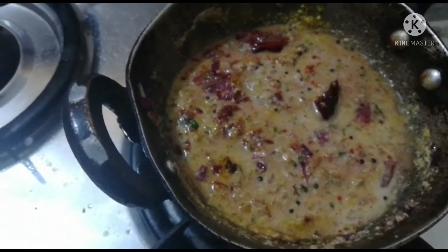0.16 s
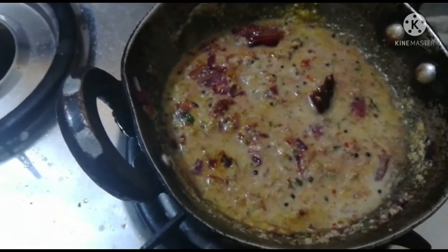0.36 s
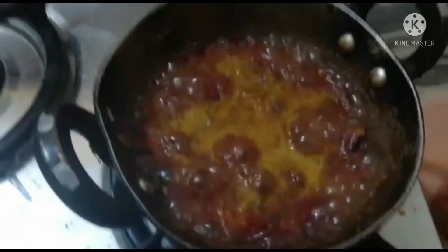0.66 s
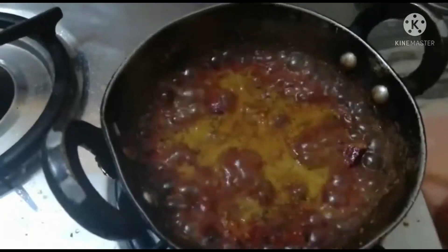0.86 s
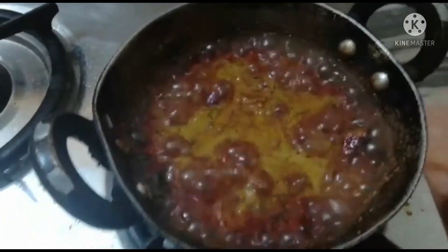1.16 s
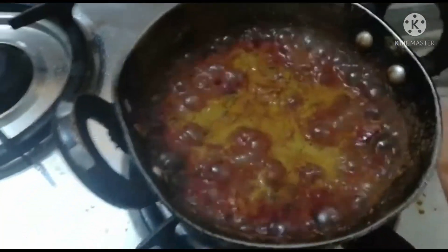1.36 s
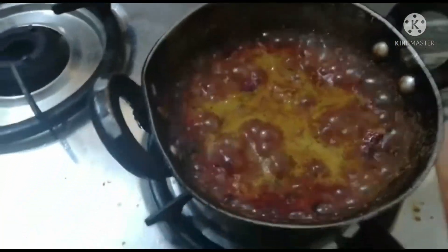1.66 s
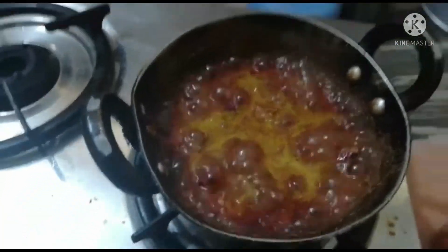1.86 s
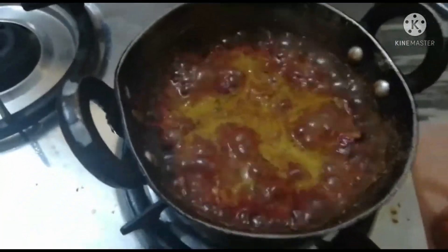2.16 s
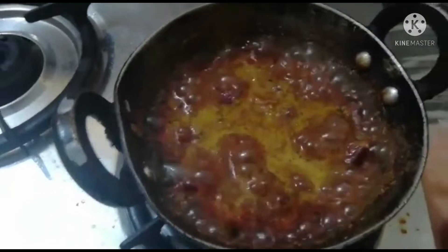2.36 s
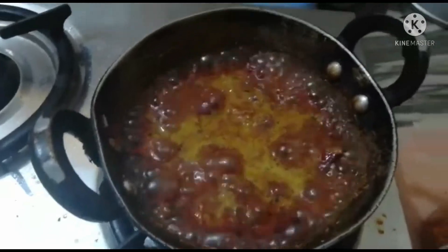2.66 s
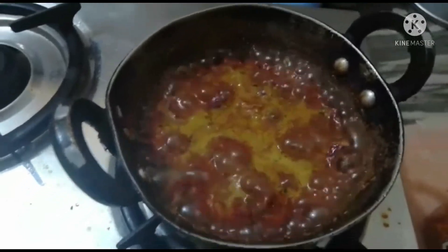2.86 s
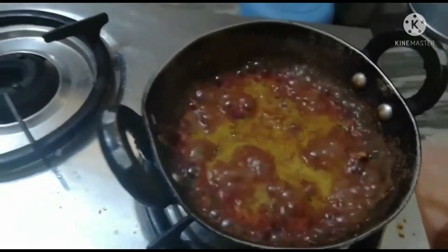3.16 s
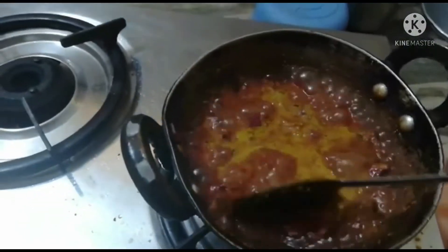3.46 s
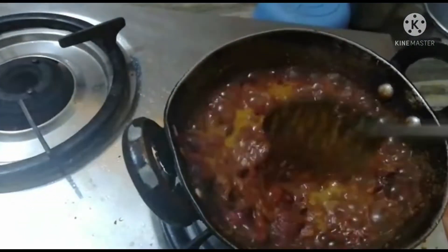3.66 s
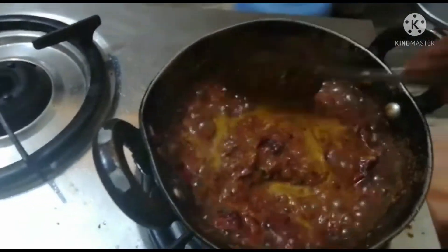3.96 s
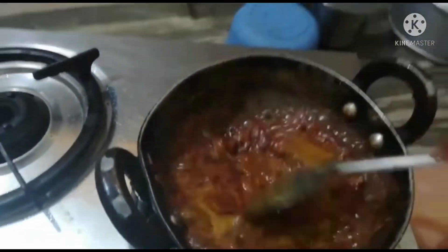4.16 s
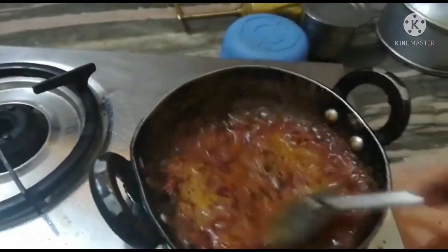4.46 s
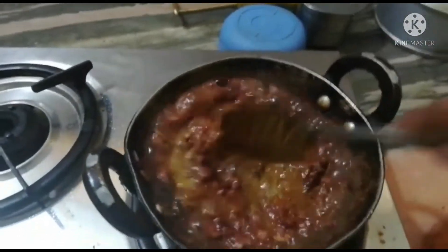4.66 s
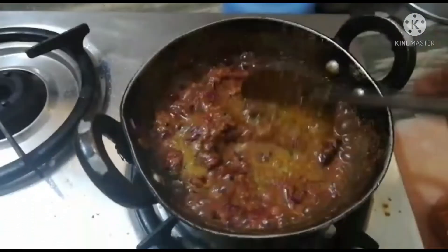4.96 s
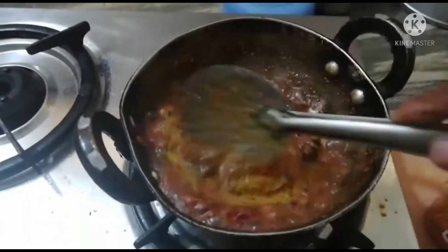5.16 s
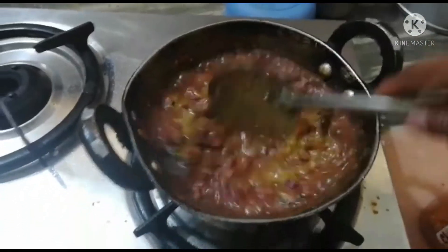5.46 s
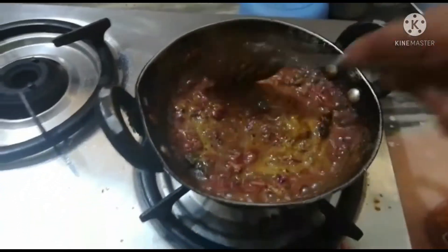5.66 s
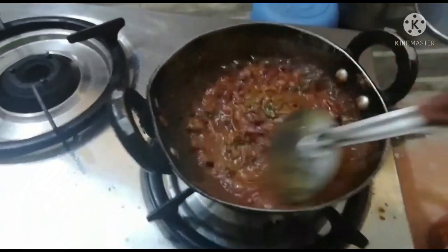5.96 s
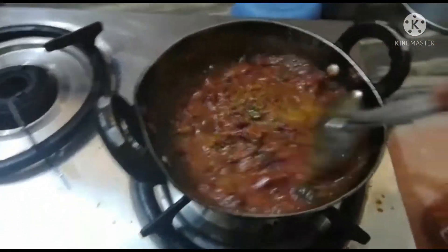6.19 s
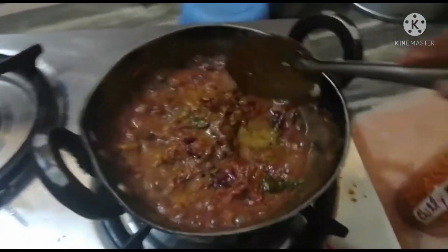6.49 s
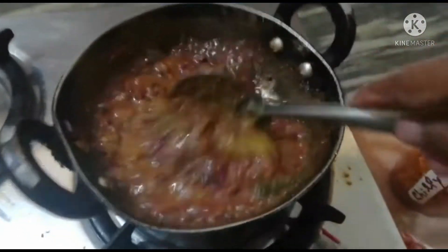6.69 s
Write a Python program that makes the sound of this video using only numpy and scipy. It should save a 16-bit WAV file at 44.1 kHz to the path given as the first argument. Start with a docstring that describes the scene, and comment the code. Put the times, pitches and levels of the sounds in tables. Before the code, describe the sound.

For the first half second spices fry very quietly, with a faint clink at the start and a faint distant vessel ring near 0.5 s. The sound fades out by 0.6 s and is silent until 0.9 s. Then a thick sauce comes in abruptly, bubbling densely, crackling and spitting over fine sizzle and a low gas-flame rumble. A strong low bump of the hand-held microphone comes at 2.2 s. Bright, thin steel clinks follow at 2.55, 2.65 and 2.8 s, among sharp pops. From 3.5 s sizzle flares with stirring. The spoon knocks and lightly scrapes the pan at 4.2-4.3 s, clangs at 4.7 s; a sharp spit and low bumps fall around 5.0-5.1 s. Busier knocks and rasps run from 5.6 to 6.15 s under a stronger sizzle, then single knocks at 6.4 and 6.5 s, and the loudest ringing knock at 6.8 s.

```python
"""Spices fry quietly; after a short silence, a thick sauce bubbles, spits and sizzles in a metal pan.
The food is random bursts ringing in resonators over hiss; single bursts, faint to loud, are swelling tones with a snap.
A steel spoon clinks on cutlery, then scrapes and knocks the pan: decaying modes over a wash of filtered noise.
Low noise rumbles as the gas flame, a vessel rings faintly, and swinging low tones bump the hand-held microphone.
"""
import sys
import numpy as np
from scipy import signal
from scipy.fft import rfft, irfft, next_fast_len
from scipy.io import wavfile

SR = 44100
rng = np.random.default_rng(int(sys.argv[2]) if len(sys.argv) > 2 else 0)


def materialize(psi):
    """Save the field psi as 16-bit PCM at rate SR to the path in sys.argv[1].

    A 1-D psi becomes a single channel; in a 2-D psi each row is a channel.
    """
    bounded = np.clip(np.atleast_2d(psi).T, -1, 1)
    quanta = np.round(bounded * 32767).astype(np.int16)
    wavfile.write(sys.argv[1], SR, quanta)


N = 300968
TIME = np.arange(N) / SR
RING_TIME = np.arange(int(.45 * SR)) / SR   # the span of one struck, burst or bumped sound
FRYING_END_S, SAUCE_START_S = .632, .909   # silence lies between these

# modes of the pan: f/Hz before detuning, level/dB, t60/s
PAN_MODES = [(160, -14, .25), (285, -11, .3), (335, -7, .25), (404, -1, .42), (479, -4, .45),
             (560, -10, .25), (646, -6, .4), (669, -2, .45), (759, -10, .35), (1093, -8, .35),
             (1250, -12, .3), (1445, -13, .4), (2277, -13, .35), (2670, -10, .4), (3268, -13, .35),
             (3750, -10, .5), (4270, -15, .35), (4695, -9, .45), (5975, -12, .4), (6498, -10, .35),
             (6790, -11, .4), (7010, -10, .4), (7332, -11, .35), (7480, -12, .4), (8021, -12, .3)]
# spectrum of the pan's crowded modes and the kitchen's echoes: f/Hz, relative level/dB
PAN_WASH = [(120, 1), (220, 1), (330, 7.5), (410, 5), (530, 9), (670, 6), (850, 2), (1150, 0), (1700, -6),
            (3000, -4), (5200, -3.5), (7000, 1.5), (8500, -4), (10000, -14.5), (15000, -29)]
PAN_WASH_T60_S = 0.43


def from_db(db):
    """Decibels to gain."""
    return 10 ** (np.asarray(db) / 20)


def rms_one(x):
    """Scale to unit power."""
    return x / np.sqrt(np.mean(x ** 2) + 1e-20)


def at_hz(points, hz):
    """Read a two-column table on a log-frequency axis."""
    table_hz, values = np.array(points).T
    return np.interp(np.log(hz + 1e-3), np.log(table_hz), values)


def dying(t60):
    """Envelope that falls 60 dB in t60 seconds."""
    return from_db(-60 * RING_TIME / max(t60, 1e-4))


def cut(x, hz, kind, order=2):
    """Causal low- or high-pass."""
    sos = signal.butter(order, min(hz, .45 * SR), kind, fs=SR, output="sos")
    return signal.sosfilt(sos, x + 1e-18)


def panned(x, left_db):
    """Make the left side louder than the right by left_db."""
    return x * from_db([[left_db / 2], [-left_db / 2]])


def add(out, s, sound):
    """Mix a sound in at time s."""
    start = max(round(s * SR), 0)
    out[:, start:start + sound.shape[-1]] += sound[..., :max(N - start, 0)]


def drift(rate):
    """Slow chance: straight lines between random knots of spread 1, at this many knots per second."""
    knots = rng.standard_normal(4096)
    return np.interp(TIME * rate, np.arange(len(knots)), knots)


def coloured(pair, spectrum):
    """Two unrelated signals become mid and side of a stereo sound shaped by a spectrum, alike in the bass; rms 1."""
    # likeness of the two channels: f/Hz, correlation from -1 to 1
    channel_likeness = [(100, 0.99), (290, 0.91), (450, 0.41), (620, -0.34), (1000, 0.29), (1400, 0.81),
                        (2400, -0.0015), (4000, -0.02)]
    length = pair.shape[-1]
    size = next_fast_len(length)
    hz = np.arange(size // 2 + 1) * SR / size
    mid, side = rfft(pair, size) * from_db(at_hz(spectrum, hz))
    alike = np.clip(at_hz(channel_likeness, hz), -.995, .995)
    stereo = np.sqrt(1 + alike) * mid + np.sqrt(1 - alike) * side * [[1], [-1]]
    return rms_one(irfft(stereo, size)[:, :length])


def fizz(spectrum, per_s, low_hz, high_hz, cycles, size_db, blur_db, clump_db, count=16):
    """Bubbles of all sizes burst in random clusters and ring for some cycles; the tiniest and the room blur to hiss."""
    chance = per_s * from_db(clump_db * drift(30)) / SR
    born = np.flatnonzero(rng.random(N) < chance)
    sizes = from_db(size_db * np.minimum(rng.exponential(1, len(born)), 4.5))
    bearing = rng.uniform(0, 2 * np.pi, len(born))
    spread = np.array([np.cos(bearing), np.sin(bearing)])
    dealt = rng.integers(0, count, len(born))   # which pitch each bubble has
    grains = np.zeros((2, N))
    for k, hz in enumerate(np.geomspace(low_hz, min(high_hz, .4 * SR), count)):
        clicks = np.full((2, N), 1e-18)
        clicks[:, born] += sizes * (dealt == k) * spread
        # a two-pole resonator that falls 60 dB in the given cycles
        r, w = from_db(-60 * hz / (cycles * SR)), 2 * np.pi * hz / SR
        ringing = signal.lfilter([1, 0, -1], [1, -2 * r * np.cos(w), r * r], clicks)
        grains += hz * ringing / np.sin(w)
    hiss = from_db(blur_db) * rng.standard_normal((2, N))
    return coloured(rms_one(grains) + hiss, spectrum)


def struck(modes, wash, t60, wash_db, vary_db):
    """Metal after one touch: clear modes, and a wash of crowded modes and kitchen echoes."""
    # phase by which modes lead on the left: f/Hz, phase/rad
    left_lead = [(404, 0.6), (480, 0.5), (560, 3), (670, 2.5), (760, -2.5), (1100, -1.4), (1500, -1)]
    detune = 0.0024   # grip and load shift each mode from touch to touch, as a share of its pitch
    tones = 0
    for hz, db, mode_t60 in modes:
        # low modes reach the two sides at a set phase, high ones at unrelated phases
        scatter = rng.uniform(-np.pi, np.pi, (2, 1)) * min(hz / 2000, 1) ** 3
        phase = scatter + at_hz(left_lead, hz) * np.array([[1], [0]])
        strength = from_db(db + vary_db * rng.standard_normal((2, 1)))
        shifted_hz = hz * (1 + detune * rng.standard_normal())
        tones = tones + strength * dying(mode_t60) * np.sin(2 * np.pi * shifted_hz * RING_TIME + phase)
    tones = tones / np.sqrt(sum(from_db(db) ** 2 for _, db, _ in modes) / 2)
    wash_noise = coloured(rng.standard_normal((2, len(RING_TIME))), wash)
    return (tones + from_db(wash_db) * dying(t60) * wash_noise) / np.sqrt(2)


def chattering(ringing, seconds, slip):
    """A first touch and a dying train of tiny slips each set the metal ringing."""
    count = len(RING_TIME)
    slips = rng.standard_normal(count) * (rng.random(count) < 900 / SR)
    touches = slip * slips * np.exp(-RING_TIME / max(seconds, 1e-4))
    touches[0] = 1
    return signal.fftconvolve(ringing, touches[None] / np.linalg.norm(touches))[:, :count]


def sliding(ringing, seconds):
    """Edge on edge, fine slips swell and die away, each setting the metal ringing."""
    age = (RING_TIME + 1 / SR) / max(seconds, 1e-4)
    slips = rng.standard_normal(len(age)) * age * np.exp(-age)
    return signal.fftconvolve(ringing, slips[None] / np.linalg.norm(slips))[:, :len(age)]


def favouring(sound, hz, db, width_hz):
    """A resonance adds weight to one band, such as the modes favoured by the spot of a blow."""
    return sound + from_db(db) * signal.lfilter(*signal.iirpeak(hz, hz / width_hz, fs=SR), sound)


def snap(peak_db, snap_s, top_hz):
    """The broadband click of a film tearing or of steel first touching, dulled above top_hz."""
    age = RING_TIME / max(snap_s, 1e-5)
    return from_db(peak_db) * cut(np.exp(-age) * np.cos(age), top_hz, "low")


def burner():
    """The flame's low rumble booms in the hollow under the pan, above a deep rumble of the hand-held microphone."""
    # spectrum of the flame: f/Hz, relative level/dB
    flame_spectrum = [(20, 1.5), (50, -7), (100, 7), (128, -4), (165, 10), (195, -28), (225, -12),
                      (250, -3.5), (280, 4), (310, -5), (430, -7.5), (600, -22), (1200, -28)]
    spices_db, sauce_db, sag_db_per_s = -70, -54, 0.83   # under the sauce it slowly sags
    level_db = np.where(TIME < FRYING_END_S, spices_db, sauce_db - sag_db_per_s * (TIME - SAUCE_START_S))
    flame = coloured(rng.standard_normal((2, N)), flame_spectrum)
    flutter_db = 0.1 * drift(11)
    microphone_rumble = rms_one(cut(rng.standard_normal(N), 68, "low", order=3))
    return from_db(level_db + flutter_db) * flame + from_db(-66.5) * microphone_rumble


def far_clank():
    """A vessel is touched further off in the kitchen: fine slips wake its modes faintly."""
    # modes of the vessel: f/Hz before detuning, level/dB, t60/s
    vessel_modes = [(888, 2, 0.39), (1170, -10, .2), (1510, -11, .3), (1900, -3, 0.54), (2650, -5, .4)]
    # spectrum of its wash: f/Hz, relative level/dB
    vessel_wash = [(300, -15), (900, 3), (2000, 6), (3000, -20), (6000, -30)]
    out = np.zeros((2, N))
    ringing = struck(vessel_modes, vessel_wash, t60=0.43, wash_db=-3.0, vary_db=1)
    add(out, .513, from_db(-59.5) * sliding(ringing, seconds=0.012))
    return out


def handling(rub_db, rub_hz, steepness):
    """Fingers bump the housing: a low swing swells and dies, with a dull rub at its height, later on the left."""
    # bumps: t/s, level/dB, swell/s, swing f/Hz
    bump_events = [(0.47, -45, 0.0082, 61), (2.181, -25.5, 0.029, 88), (2.294, -49, 0.014, 87),
                   (2.4, -49.5, 0.051, 103), (2.518, -41, 0.016, 67.6), (2.55, -47, 0.048, 126),
                   (3.94, -54, 0.036, 61.5), (4.987, -36, 0.013, 82), (5.037, -34.5, 0.015, 64.4),
                   (5.151, -53, 0.037, 82.6), (5.807, -45, 0.018, 70)]
    # swings of the housing: multiple of the swing's pitch, level/dB
    housing_modes = [(.3, -2), (.6, -5), (1, 1), (1.35, -5), (1.9, -14.5), (2.9, -18.5)]
    left_lag_s = 0.00065
    out = np.zeros((2, N))
    for s, db, swell_s, hz in bump_events:
        swing = sum(from_db(mode_db) * np.sin(2 * np.pi * multiple * hz * RING_TIME)
                    for multiple, mode_db in housing_modes)
        rub = from_db(rub_db) * rms_one(cut(rng.standard_normal(len(RING_TIME)), rub_hz, "low", order=4))
        age = RING_TIME / max(swell_s, 1e-3)
        pressure = (age * np.exp(1 - age)) ** steepness
        add(out, s, from_db(db) * pressure * (swing + rub * pressure ** 4))
    return np.array([np.interp(TIME - left_lag_s, TIME, out[0]), out[1]])


def cutlery(low_t60, contact_t60, contact_db):
    """The spoon slides off other steel; a clean tap ticks sharply, and its lower modes sound too."""
    # clinks: t/s, level/dB, low modes' level/dB re the clink, sliding/s, favoured f/Hz, wash level/dB re the modes
    clink_events = [(0, -70, -8, 0.001, 5400, 10), (2.5475, -36, -15, 0.00098, 6040, -12),
                    (2.559, -32, -22, 0.00094, 6540, -4), (2.646, -41, -20, 0.00075, 5450, 0),
                    (2.66, -34.5, -12, 0.0012, 6100, -0.5), (2.7934, -35.5, 1, 0.00045, 6400, 5.5),
                    (2.8179, -43, -2, 0.00074, 7000, 2)]
    # the spoon's upper, then lower modes: f/Hz before detuning, level/dB, t60/s
    spoon_modes = [(5416, -8, .25), (5790, -15, .33), (5950, -8, .22), (6002, -5, .36), (6430, -8, .33),
                   (6590, -6, .25), (6869, -11, .3), (7260, -5, .3), (7935, -6, .3), (8183, -12, .3),
                   (8420, -11, .3), (8720, -7, .22)]
    spoon_low_modes = [(4490, -9, .3), (4657, -1, .37), (4818, -4, .4), (4893, -5, .36), (5066, -7, .36),
                       (5270, -8, .42)]
    # spectra of their washes: f/Hz, relative level/dB
    spoon_wash = [(3000, -33), (4700, -14), (5400, 2), (6500, -4.5), (8500, -2), (9500, -10), (11000, -17),
                  (15000, -33)]
    spoon_low_wash = [(1500, -40), (2600, -16), (3900, -17), (4400, -1), (4750, 2), (5200, -2), (5700, -22),
                      (9000, -45)]
    out = np.zeros((2, N))
    for s, db, low_db, slide_s, favoured_hz, wash_db in clink_events:
        ringing = struck(spoon_modes, spoon_wash, t60=0.43, wash_db=wash_db, vary_db=0)
        ringing = favouring(ringing, favoured_hz, db=-2, width_hz=320)
        # the direct sound of the contact stands above the ringing; longer sliding takes the tick away
        tick = from_db(13) * np.exp(-slide_s / 0.00043)
        ringing = ringing * (1 + from_db(contact_db) * dying(contact_t60) + tick * dying(.009))
        low_ringing = struck(spoon_low_modes, spoon_low_wash, low_t60, wash_db=4, vary_db=1)
        ringing = from_db(db) * (ringing + from_db(low_db) * low_ringing)
        add(out, s, sliding(ringing, slide_s))
        add(out, s + slide_s, tick * snap(db - 1, snap_s=.00003, top_hz=15000))
    return panned(out, left_db=-4.5)


def scraping(low_hz, high_hz, favour_db, width_hz):
    """The spoon's edge drags over the pan; fine slips make its upper modes rasp."""
    # scrapes: t/s, level/dB, swell/s, favoured f/Hz
    scrape_events = [(4.288, -48, 0.0069, 2190), (5.627, -42.5, 0.0075, 2540), (5.926, -33, 0.0055, 2530),
                     (6.13, -47.5, 0.00086, 2610)]
    out = np.zeros((2, N))
    for s, db, swell_s, hz in scrape_events:
        ringing = struck(PAN_MODES, PAN_WASH, PAN_WASH_T60_S, wash_db=12, vary_db=1)
        ringing = ringing * dying(1)   # the dragging spoon damps the pan
        ringing = cut(cut(ringing, low_hz, "high", order=4), high_hz, "low", order=4)
        add(out, s, from_db(db) * sliding(favouring(ringing, hz, favour_db, width_hz), swell_s))
    return out


def stirring(split_hz, favour_db, hard_db, hard_hz, lowest_hz):
    """The spoon knocks the pan: its floor thuds, the mode under the blow rings, bare steel chatters brightly."""
    # knocks: t/s, level/dB, brightness/dB re the level, chatter/s, favoured f/Hz, its ring level/dB, thud level/dB
    knock_events = [(4.2433, -41, -11.5, .012, 1130, -50, -44), (4.288, -47, -13, .02, 410, -46, -48),
                    (4.658, -40, 9.5, 0.025, 663, -37.5, -39.5), (4.69, -46, 9, .01, 797, -50, -45),
                    (4.711, -45.5, 5, .005, 665, -44.5, -47), (5.039, -52, -9, .01, 1130, -59, -52),
                    (5.607, -42.5, -5, .012, 1112, -43, -41), (5.634, -39.5, -11, .02, 1220, -56, -43),
                    (5.685, -51, -5, .02, 407, -46, -58), (5.862, -39, 5.5, 0.011, 670, -42, -43),
                    (5.9157, -34, 4, 0.0086, 1056, -49, -34.5), (5.931, -37, -0.5, 0.011, 404, -33.5, -50),
                    (6.079, -43, -20, .02, 1095, -41.5, -54), (6.1, -45.5, -20, .01, 286, -45, -53),
                    (6.134, -43.5, 1, 0.021, 399, -42, -47), (6.422, -37.5, 5.5, 0.0086, 673, -36.5, -41.5),
                    (6.514, -40, 2.5, .009, 479, -49, -42.5), (6.776, -45, -20, .01, 763, -46, -54),
                    (6.794, -30, 3.5, .0105, 352, -30.5, -30)]
    # modes of the pan's floor, damped by sauce: f/Hz, level/dB, t60/s
    thud_modes = [(317.6, -5, 0.3), (492, -1.5, .11), (819, -2, 0.061), (1130, -2.5, 0.095)]
    thud = sum(from_db(db) * dying(t60) * np.sin(2 * np.pi * hz * RING_TIME) for hz, db, t60 in thud_modes)
    out = np.zeros((2, N))
    for s, db, bright_db, chatter_s, favoured_hz, ring_db, thud_db in knock_events:
        ringing = struck(PAN_MODES, PAN_WASH, PAN_WASH_T60_S, wash_db=5.5, vary_db=2)
        ringing = favouring(ringing, favoured_hz, favour_db, width_hz=70)
        # the harder the blow, the shorter the contact and the more top it has
        ringing = ringing + from_db(db - hard_db) * cut(ringing, hard_hz, "high", order=1)
        body = from_db(db) * cut(cut(ringing, split_hz, "low", order=4), lowest_hz, "high")
        # the mode under the blow sounds straight at the microphone
        ring = from_db(ring_db) * dying(0.21) * np.sin(2 * np.pi * favoured_hz * RING_TIME)
        clang = chattering(cut(ringing, split_hz, "high", order=4), chatter_s, slip=0.11)
        low_part = panned(body + ring + from_db(thud_db) * thud, left_db=-1.3)
        add(out, s, low_part + from_db(db + bright_db) * clang)
    return out


def random_pops():
    """More bursts scattered at random over the boil: rows of (t/s, level/dB, f/Hz, snap/dB re the level)."""
    per_s, middle_db, spread_db = 16, -49, 8.5
    low_hz, high_hz, snap_db = 1210, 3700, 1
    boil_s = TIME[-1] - SAUCE_START_S
    when, size, pitch = rng.random((int(per_s * boil_s), 3)).T
    times = SAUCE_START_S + when * boil_s
    levels = middle_db + spread_db * (2 * size - 1)
    pitches = low_hz * (high_hz / low_hz) ** pitch
    return [(s, db, hz, snap_db) for s, db, hz in zip(times, levels, pitches)]


def pops(room_db, room_t60):
    """Bubbles burst and fat spits: each snaps, swells and rings for a few cycles, and the kitchen answers."""
    # single bursts, faint to loud: t/s, level/dB, f/Hz, snap/dB re the level
    single_pops = [(0.4716, -55.5, 1100, 16.5), (1.033, -43, 1590, -12), (1.1756, -39.5, 1590, -12),
                   (1.3, -38, 1610, -2), (1.392, -38, 1510, 14), (1.4542, -37.5, 1370, -23),
                   (1.859, -40, 1700, -6), (2.3623, -44, 1760, -4), (2.5, -25.5, 6600, 3.5),
                   (2.5303, -25, 6740, -5), (2.771, -24.5, 7300, -14), (3.0378, -39, 1900, -3),
                   (3.2195, -42.5, 1950, -12), (3.2568, -47, 1700, -3), (3.3267, -43, 1500, -10),
                   (3.5377, -39.5, 1790, -10), (3.6358, -29.5, 6960, -9), (3.8282, -29, 6600, -14),
                   (3.865, -40.5, 1770, -10), (4.0646, -46, 1700, -3), (4.102, -28, 2710, 6.5),
                   (4.828, -27.5, 3600, -31), (4.895, -37.5, 1850, -8), (4.9293, -42.5, 6500, 20.5),
                   (5.074, -17.5, 6650, -13), (5.2198, -32.5, 6900, -11), (5.273, -30, 6900, -8),
                   (5.332, -37.5, 2260, 7), (5.409, -39, 8200, -6), (6.28, -37, 1850, -5),
                   (6.6427, -36, 2850, -12)]
    rise_cycles, ring_cycles = 2.1, 6.3   # ring: to -60 dB, for a burst whose snap is 0 dB
    ring_per_snap = 0.27   # the less a burst snaps, the longer it rings (dB of length per dB of snap)
    out = np.zeros((2, N))
    for s, db, hz, snap_db in [*single_pops, *random_pops()]:
        rise = (1 - np.exp(-RING_TIME * hz / rise_cycles)) ** 2
        shape = rise * dying(ring_cycles * from_db(-ring_per_snap * snap_db) / hz)
        tone = from_db(db) * shape / shape.max() * np.sin(2 * np.pi * hz * RING_TIME)
        burst = tone + snap(db + snap_db, snap_s=.00005, top_hz=11300)
        echoes = rng.standard_normal((2, len(RING_TIME))) * dying(room_t60)
        echoes *= from_db(room_db) / np.linalg.norm(echoes[0])
        add(out, s, burst + signal.fftconvolve(echoes, burst[None])[:, :len(burst)])
    return panned(out, left_db=-1.0)


def sizzle_level():
    """A slowly calming sizzle, plus a flare as each sweep of the spoon puts sauce on hot metal; as a gain."""
    # flares: t/s, peak level/dB, rise/s, dying time/s
    flare_events = [(3.55, -52.5, 0.057, 0.49), (4.35, -49, 0.13, 1.0), (5.52, -42.5, 0.23, 0.26),
                    (6.22, -42.5, 0.022, 0.56)]
    calm_db, sag_db_per_s = -50.5, 0.3
    power = from_db(calm_db - sag_db_per_s * (TIME - SAUCE_START_S)) ** 2
    for s, db, rise_s, dying_s in flare_events:
        rise = np.clip((TIME - s) / rise_s, 0, 1)
        flare = rise * np.exp(-np.maximum(TIME - s - rise_s, 0) / dying_s)
        power = power + (from_db(db) * flare) ** 2
    return np.sqrt(power)


def food():
    """Quiet frying at first; then steam bubbles through the sauce, films tear and fat sizzles at its edge."""
    # vigour of the boil: t/s, level/dB
    boil_curve = [(1.15, -49), (1.21, -48.5), (2.13, -51.5), (4.04, -51.5), (5.42, -55), (6.05, -49.5),
                  (6.2, -52), (6.75, -53)]
    # hollow of the pan, where bubbling resounds: f/Hz, level/dB re the bubbling, width/Hz
    pan_hollow = [(1100, -1.5, 60), (1420, -14.5, 120), (1860, -17, 140), (3350, -12.5, 115)]
    # spectra of the four textures: f/Hz, relative level/dB
    frying_spectrum = [(300, 5.5), (700, 1), (1000, 3), (1800, 1), (3000, -2.5), (4600, -3), (5500, -7.5),
                       (8500, -8), (15000, -19)]
    bubbling_spectrum = [(250, -8), (450, -1.5), (900, -10.5), (1150, -5.5), (1500, -3.5), (2000, -1),
                         (2600, -2), (3400, -1), (4800, -5), (7000, -13.5), (12000, -59)]
    crackling_spectrum = [(600, -16), (1300, -5.5), (1900, -0.5), (2600, -4), (3500, -5), (6000, -11),
                          (12000, -25)]
    sizzling_spectrum = [(1500, -20.5), (3500, -10), (5400, -8), (6500, -1.5), (7400, -1), (8500, -5.5),
                         (10000, -11.5), (12000, -18.5), (15500, -27)]

    boil_db = np.interp(TIME, *np.transpose(boil_curve))
    frying = fizz(frying_spectrum, per_s=200, low_hz=5000, high_hz=13000, cycles=1.7,
                  size_db=7.5, blur_db=4.0, clump_db=8.0, count=6)
    bubbling = fizz(bubbling_spectrum, per_s=900, low_hz=654, high_hz=4550, cycles=18.0,
                    size_db=2.0, blur_db=9.0, clump_db=4.0)
    # thin films of sauce tear in clusters
    crackling = fizz(crackling_spectrum, per_s=380, low_hz=1200, high_hz=5500, cycles=2.8,
                     size_db=2, blur_db=-9, clump_db=5, count=9)
    sizzling = fizz(sizzling_spectrum, per_s=3200, low_hz=3700, high_hz=12900, cycles=5.7,
                    size_db=4.5, blur_db=6.5, clump_db=7.0, count=12)
    for hz, db, width_hz in pan_hollow:
        bubbling = favouring(bubbling, hz, db, width_hz)
    bubbling = panned(bubbling, left_db=-2.0) * from_db(boil_db + 1.5 + 0.11 * drift(34))
    crackling = crackling * from_db(boil_db - 7.5)
    sizzling = panned(sizzling, left_db=-1.5) * sizzle_level() * from_db(0.41 * drift(24))
    return np.where(TIME < FRYING_END_S, from_db(-64) * frying, bubbling + crackling + sizzling)


def scene():
    """Everything at the stove."""
    background = burner() + far_clank()
    bumps = handling(rub_db=-9.5, rub_hz=320, steepness=1.83)
    clinks = cutlery(low_t60=0.47, contact_t60=0.029, contact_db=-1.0)
    scrapes = scraping(low_hz=1700, high_hz=3600, favour_db=2.0, width_hz=360)
    knocks = stirring(split_hz=1470, favour_db=3.5, hard_db=-38.5, hard_hz=13100, lowest_hz=208)
    bursts = pops(room_db=-4.5, room_t60=0.12)
    return background + bumps + clinks + scrapes + knocks + bursts + food()


def record(dry):
    """The sound fades, stops, and returns with the sauce; a steep low-pass cuts the top."""
    fade_start_s, fade_db_per_s, cutoff_hz = .56, 209, 15300
    fading = from_db(-fade_db_per_s * np.maximum(TIME - fade_start_s, 0)) * (TIME < FRYING_END_S)
    gain = np.where(TIME < SAUCE_START_S, fading, 1)
    low_pass = signal.ellip(10, .1, 80, cutoff_hz, fs=SR, output="sos")
    return signal.sosfilt(low_pass, dry * gain)


dry = scene()
out = record(dry)
materialize(out)
```